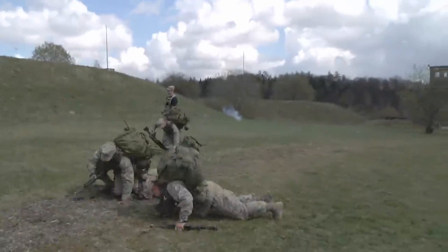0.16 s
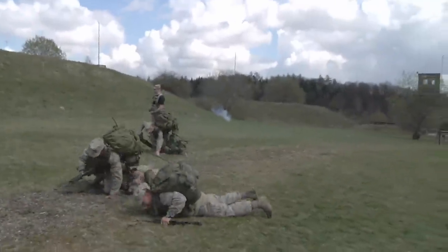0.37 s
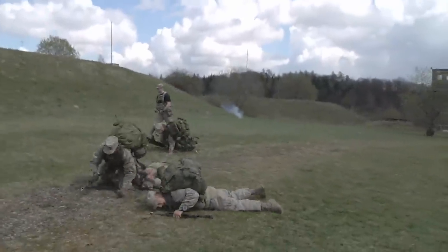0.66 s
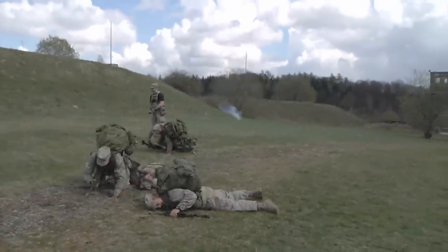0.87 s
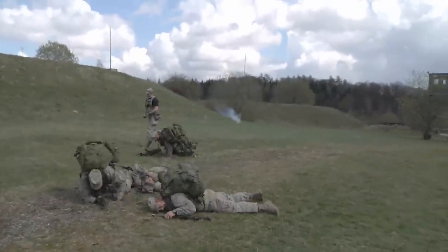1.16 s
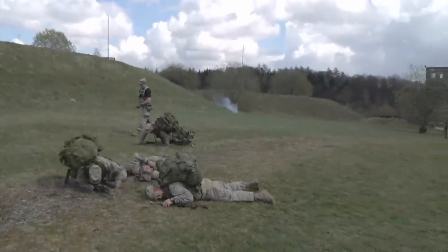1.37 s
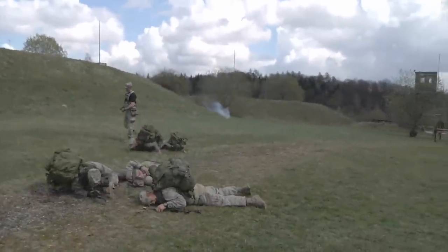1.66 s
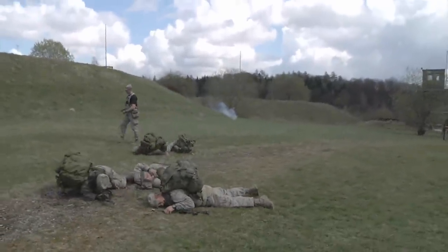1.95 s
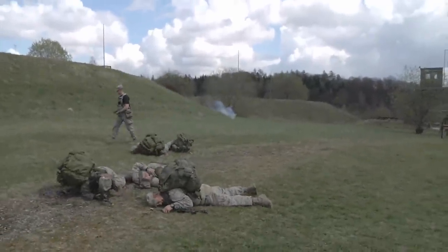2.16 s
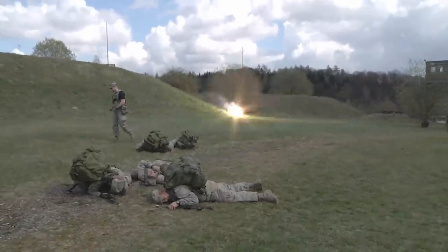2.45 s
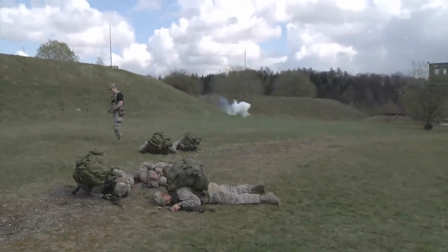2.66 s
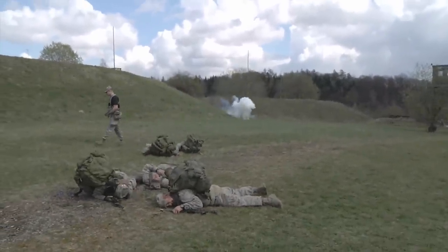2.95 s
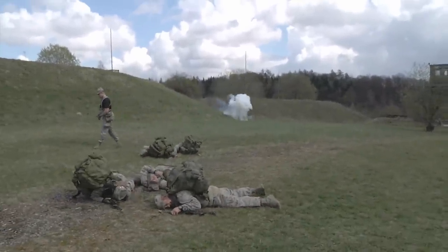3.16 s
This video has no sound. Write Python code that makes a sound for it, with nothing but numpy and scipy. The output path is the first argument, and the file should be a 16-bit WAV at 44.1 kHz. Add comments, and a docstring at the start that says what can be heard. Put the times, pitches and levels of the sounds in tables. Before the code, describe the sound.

A loud explosion goes off on an open field. Before it, a faint whistle sinks slowly while soldiers drop to the grass with soft thuds and rustles. The sharp blast briefly overloads the microphone, then echoes and rumbles away.

```python
"""An open training field, on a stereo microphone in light wind. An artillery simulator whistles as it
burns, while soldiers drop to the grass with their packs and buckles tick. The whistle sinks in pitch
until the charge bursts at 2.6 s, near enough for the shock wave to ring the microphone housing and
overload the recorder. Then earth banks and the forest edge, farther off, throw back slaps,
crackling echoes and a low rolling rumble."""
import sys
import numpy as np
from scipy import signal
from scipy.fft import rfft, irfft
from scipy.io import wavfile

SR = 44100
rng = np.random.default_rng(int(sys.argv[2]) if len(sys.argv) > 2 else 0)


def store_pcm(level_fs):
    """Save levels as 16-bit WAV."""
    pcm = np.round(np.clip(level_fs, -1, 1) * 32767).astype(np.int16)
    wavfile.write(sys.argv[1], SR, np.atleast_2d(pcm).T)


N = 145530
T = np.arange(N) / SR
BLAST_S, PUSH_S = 2.6172, 0.0019  # moment of the burst, length of its pressure push

# stereo width of the air and the soldiers: (frequency [Hz], side over mid [dB])
FIELD_WIDTH = [(100, -14), (700, -15.5), (3000, -13), (7000, 0.5), (15000, 2)]
# stereo width of the echoes and the rumble: (frequency [Hz], side over mid [dB])
ECHO_WIDTH = [(100, -36), (600, -20.5), (1400, -10.5), (3100, -9.5), (6800, 0.5), (15000, 3)]


def from_db(db):
    """Decibels to gain."""
    return 10 ** (np.asarray(db) / 20)


def rms_one(x):
    """Scale to unit power."""
    return x / np.sqrt(np.mean(x ** 2) + 1e-20)


def in_time(rows):
    """Join (time [s], value) points by straight lines."""
    return np.interp(T, *np.transpose(rows))


def gains(points):
    """Gain at every frequency from (frequency [Hz], level [dB]) points."""
    hz, db = np.transpose(points)
    return from_db(np.interp(np.log(np.fft.rfftfreq(N, 1 / SR) + 1), np.log(hz), db))


def butter(x, hz, kind, order=2):
    """Causal low-, high- or band-pass."""
    return signal.sosfilt(signal.butter(order, hz, kind, fs=SR, output="sos"), x + 1e-18)


def drift(rate_hz):
    """Random wander of unit power, mostly slower than the rate."""
    hz = np.fft.rfftfreq(N, 1 / SR)
    return rms_one(irfft(rfft(rng.standard_normal(N)) / (1 + (hz / rate_hz) ** 2), N))


def noise(colour, width, grain_db=0):
    """Coloured stereo noise of unit power; grain makes it crackle."""
    white = rng.standard_normal((2, N)) * from_db(grain_db * drift(1350))
    mid, side = rfft(white) * gains(colour)
    side = side * gains(width)
    return rms_one(irfft(np.array([mid + side, mid - side]), N))


def burst(start, attack_s, decay_s):
    """An envelope that rises linearly from the start, then decays exponentially."""
    age = T - start
    return np.clip(age / attack_s, 0, 1) * np.exp(-np.maximum(age - attack_s, 0) / decay_s)


def shock(start, push_s):
    """A pressure jump that falls through zero after the push and ends in suction."""
    age = np.maximum(T - start, 0) / push_s
    return (age > 0) * (1 - age) * np.exp(-np.minimum(age, 50))


def tail(level_db, rise_s, fall_db_per_s):
    """The envelope of reflections that build up after the blast, then fall at the given rate."""
    age = np.maximum(T - BLAST_S, 0)
    fall_db = fall_db_per_s * np.maximum(age - rise_s, 0)
    return np.minimum(age / rise_s, 1) ** 2 * from_db(level_db - fall_db)


def field():
    """Open air and stirring grass all around, light wind on the microphone and a faint hiss."""
    # spectra of the air and of the wind: (frequency [Hz], relative level [dB])
    air_colour = [(30, 7.5), (300, 0.5), (800, -4.5), (1300, -9), (2400, -11), (3600, -8), (4400, -19.5),
                  (6500, -19.5), (8000, -29.5), (15000, -35.5)]
    wind_colour = [(20, -4), (45, -3.5), (90, -1), (170, -5.5), (300, -16), (700, -36), (3000, -80)]
    # their swells: (time [s], level [dB])
    air_level = [(0, -53.5), (.45, -52.5), (.9, -58), (1.3, -52), (1.8, -54), (2.05, -58.5), (3.3, -59.5)]
    wind_level = [(0, -62.5), (.3, -44), (.65, -49.5), (.9, -62), (1.3, -66), (1.7, -61), (1.92, -45),
                  (2.2, -53), (2.6, -47.5)]
    # stereo width of the wind: (frequency [Hz], side over mid [dB])
    wind_width = [(30, -12), (300, -7)]
    air = from_db(in_time(air_level) + 0.4 * drift(45)) * noise(air_colour, FIELD_WIDTH, grain_db=1.5)
    wind = from_db(in_time(wind_level) + 0.5 * drift(24)) * noise(wind_colour, wind_width)
    hiss = from_db(-68.5) * rng.standard_normal((2, N))
    return air + wind + hiss


def buckles():
    """Buckles on the packs tick and ring briefly."""
    # buckle strikes: (time [s], level [dB])
    ticks = [(0.971, -51.5), (1.146, -52.5), (1.169, -60), (1.191, -39), (1.203, -58)]
    # spectrum of a tick: (frequency [Hz], relative level [dB])
    tick_colour = [(200, -8), (900, 4), (1500, 2.5), (2600, -3), (3600, 6), (4600, -3), (6500, -5),
                   (9500, -14.5), (15000, -22)]
    ring_hz = 3530
    clink = noise(tick_colour, FIELD_WIDTH, grain_db=2.5) + from_db(-5) * np.sin(2 * np.pi * ring_hz * T)
    return clink * sum(from_db(db) * burst(s, attack_s=0.0012, decay_s=0.0098) for s, db in ticks)


def soldiers():
    """Each drop to the ground is a thud, a scuff on the soil and a slower rustle of cloth."""
    # bodies, packs and boots landing: (time [s], decay [s], thud [dB], scuff [dB], rustle [dB])
    drops = [(.003, 0.016, -57, -49.5, -46), (0.056, 0.0058, -60, -44.5, -62), (.19, .025, -43, -74, -72),
             (0.341, 0.0071, -44, -48, -52), (0.356, 0.012, -61, -38, -76), (0.399, 0.01, -32, -50.5, -76),
             (0.486, 0.014, -40, -50, -51), (0.504, 0.035, -61, -51, -46.5), (0.568, 0.044, -39, -70, -56),
             (.635, 0.032, -70, -60, -50.5), (0.808, 0.021, -47, -51, -74), (1.24, 0.0052, -43, -51, -69),
             (1.7, 0.038, -57, -52.5, -72), (1.753, 0.0058, -34, -45, -60)]
    # spectra of the three parts: (frequency [Hz], relative level [dB])
    thud = [(20, 1), (55, 0), (110, -6), (200, -5), (400, -21), (1000, -64)]
    scuff = [(100, -19), (250, -8.5), (420, 3), (560, -7.5), (780, -2), (1200, -18), (3000, -27),
             (8000, -43)]
    rustle = [(800, -25), (1500, -10.5), (1850, -0.5), (2400, -1.5), (2800, -1.5), (3500, -13.5),
              (4400, -17), (12000, -35.5)]
    out = 0
    for k, (colour, attack_s) in enumerate([(thud, 0.0042), (scuff, 0.0042), (rustle, 0.021)]):
        level = sum(from_db(dbs[k]) * burst(s - attack_s / 2, attack_s, decay) for s, decay, *dbs in drops)
        out = out + level * noise(colour, FIELD_WIDTH, grain_db=0.5)
    return out


def bank_rumble():
    """The distant earth banks return only the bass: a few booms in a long roll."""
    # spectrum of the roll: (frequency [Hz], relative level [dB])
    roll_colour = [(20, -32), (40, -7), (65, -6), (100, 4), (170, -0.5), (250, -17), (340, -25.5),
                   (600, -39), (2000, -89)]
    # dull reflections off the banks: (time [s], peak [dB], band centre [Hz])
    booms = [(2.68, -15.5, 130), (2.729, -3.5, 119), (2.801, -15, 96), (2.833, -10.5, 139),
             (2.917, -17, 126), (3.07, -10.5, 116), (3.088, -14.5, 109)]
    edge_ratio = 1.53
    out = tail(level_db=-20.5, rise_s=0.045, fall_db_per_s=21) * noise(roll_colour, ECHO_WIDTH)
    for s, db, hz in booms:
        boom = butter(shock(s, PUSH_S), [hz / edge_ratio, hz * edge_ratio], "band", order=3)
        out = out - from_db(db) * boom / np.abs(boom).max()
    return out


def echoes():
    """The shock comes back as single slaps and as a dense crackle from nearby ground and the trees."""
    # sharp reflections: (time [s], level before filtering [dB], treble limit [Hz])
    reflections = [(2.6408, -20, 7140), (2.6628, -10, 6100), (2.6795, -9, 4500), (2.6835, -14, 4550),
                   (2.688, -17, 4000), (2.703, -0.5, 6900), (2.7243, 3, 2400), (2.7295, -0.5, 1790),
                   (2.7363, -2, 2010), (2.7395, 5.5, 1120), (2.8342, -24, 3900), (2.8366, 0.5, 3240),
                   (2.8966, -7, 6100), (2.908, -7.5, 3940), (2.9385, -22, 6900), (3.1066, -25, 4000),
                   (3.2348, -24, 1990), (3.2795, -11, 796)]
    # echoes off groups of trees: (time [s], half length [s], level [dB])
    tree_echoes = [(2.6576, 0.0013, -16.5), (2.683, 0.0039, -13), (2.71, 0.0052, -14.5),
                   (2.725, 0.0084, -19), (2.837, 0.0068, -21.5), (2.896, 0.0036, -30.5),
                   (2.911, 0.0071, -31.5), (3.12, 0.0062, -40.5), (3.241, 0.0052, -45.5),
                   (3.274, 0.0097, -39.5)]
    # spectrum of the crackle: (frequency [Hz], relative level [dB])
    colour = [(100, 12), (300, 5), (480, 2), (700, 0.5), (1200, -1), (2200, -3.5), (3400, -6.5),
              (4400, -17), (6700, -19.5), (8500, -32.5), (12000, -37), (15500, -57)]
    # lean of the stereo image: (frequency [Hz], left minus right [dB])
    balance = [(300, 1.5), (1300, -1.5), (4400, -6), (15000, 1)]
    slaps = sum(from_db(db) * butter(shock(s, push_s=0.00028), hz, "low", order=4)
                for s, db, hz in reflections)
    slaps = butter(slaps, 450, "high", order=1)
    tree_power = sum(from_db(db) ** 2 * np.exp(-.5 * ((T - s) / half) ** 2) for s, half, db in tree_echoes)
    scatter = tail(level_db=-21, rise_s=0.065, fall_db_per_s=79)
    lingering = tail(level_db=-58.5, rise_s=0.065, fall_db_per_s=0)
    ground = from_db(-28) * burst(BLAST_S, attack_s=0.00207, decay_s=.02)
    envelope = np.sqrt(tree_power + scatter ** 2 + lingering ** 2 + ground ** 2)
    crackle = envelope * from_db(1.5 * drift(47)) * noise(colour, ECHO_WIDTH, grain_db=3.5)
    lean = np.sqrt(gains(balance))
    return irfft(rfft(slaps + crackle) * np.array([lean, 1 / lean]), N)


def whistle():
    """The burning whistle and two overtones flutter on their way over the field, until the burst."""
    # the sinking tone: (time [s], pitch [Hz])
    pitch = [(0, 2176), (.1, 2256), (.38, 2220), (.64, 2230), (.9, 2189), (1.12, 2120), (1.27, 2148),
             (1.36, 2063), (1.6, 2017), (1.91, 1990), (2.0, 1932), (2.05, 1975), (2.09, 1926), (2.17, 1972),
             (2.38, 1943), (2.44, 1938), (2.61, 1890)]
    # its strength at the microphone: (time [s], level [dB])
    level = [(0, -49), (.25, -44.5), (.55, -50.5), (.8, -52.5), (1.0, -54), (1.18, -50), (1.35, -53),
             (1.75, -51), (1.9, -50.5), (2.08, -49), (2.25, -48), (2.585, -49), (2.61, -66)]
    # its harmonics: (relative level [dB], flutter depth [dB], diffuse share [dB])
    partials = [(0.5, 2.5, -15), (-11, 1.5, -13), (-29.5, -7, 4)]
    flutter_hz, scatter_hz = 35.8, 41.7  # scatter: spread in pitch of the diffuse sound off the field
    waver, rasp = .0045 * drift(31.3), 0.0063 * drift(400)
    phase = 2 * np.pi * np.cumsum(in_time(pitch) * (1 + waver + rasp)) / SR
    out = 0
    for k, (level_db, flutter_db, diffuse_db) in enumerate(partials, 1):
        diffuse = np.array([drift(k * scatter_hz) + 1j * drift(k * scatter_hz) for _ in range(2)])
        direct = from_db(flutter_db * drift(flutter_hz))
        amplitude = direct + from_db(diffuse_db) * diffuse
        out = out + from_db(level_db) * np.real(amplitude * np.exp(1j * k * phase))
    return out * from_db(in_time(level)) * (T < BLAST_S)


def blast():
    """The direct wave: a cracking front that rings the housing, the main push and a weaker second shock."""
    # modes of the microphone housing: (frequency [Hz], level [dB], time to fall 60 dB [s])
    housing = [(504, 7.5, 0.0062), (712, 13, 0.004), (2030, 13.5, 0.0024), (3140, 13.5, 0.0024),
               (4970, 20, 0.0013), (11000, 16, 0.0017)]
    right_port_lag_s, microphone_cut_hz = .00003, 65
    age = np.maximum(T - BLAST_S - np.array([[0], [right_port_lag_s]]), 0)
    ring = sum(from_db(db - 60 * age / t60) * np.sin(2 * np.pi * hz * age) * (-1) ** k
               for k, (hz, db, t60) in enumerate(housing))
    crack = from_db(2) * burst(BLAST_S, attack_s=1 / SR, decay_s=.0008) * rng.standard_normal((2, N))
    push = butter(-from_db(10.5) * shock(BLAST_S + 0.00152, PUSH_S), 900, "low")
    second_shock = butter(from_db(-2) * shock(BLAST_S + 0.00614, push_s=0.0031), 860, "low")
    return butter(push + second_shock, microphone_cut_hz, "high") + ring + crack


def scene():
    """Everything that reaches the microphone."""
    return field() + buckles() + soldiers() + whistle() + blast() + echoes() + bank_rumble()


def record(dry):
    """The recorder clips on the blast and cuts the highest treble."""
    ceiling, stopband_hz = .95, 17200
    treble_cut = signal.cheby2(12, 70, stopband_hz, fs=SR, output="sos")
    return signal.sosfilt(treble_cut, np.clip(dry, -ceiling, ceiling))


dry = scene()
out = record(dry)
store_pcm(out)
```